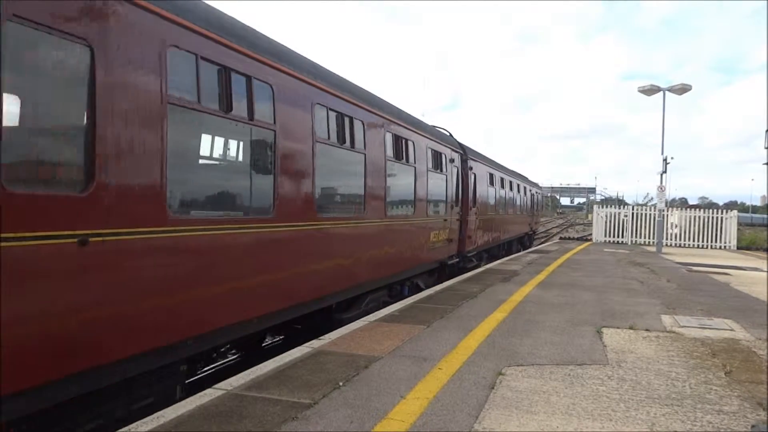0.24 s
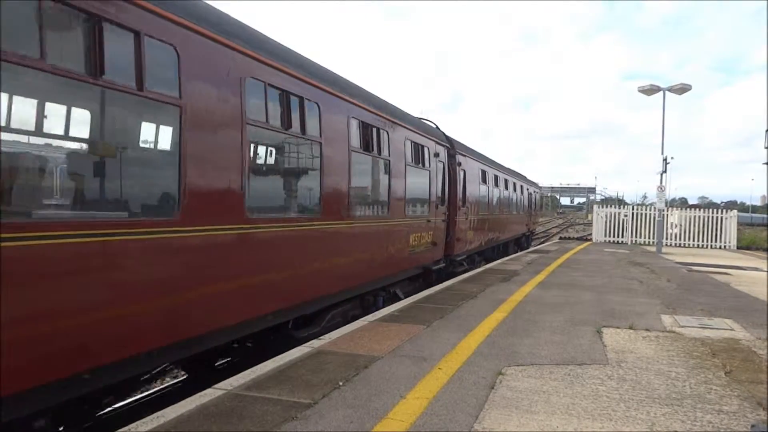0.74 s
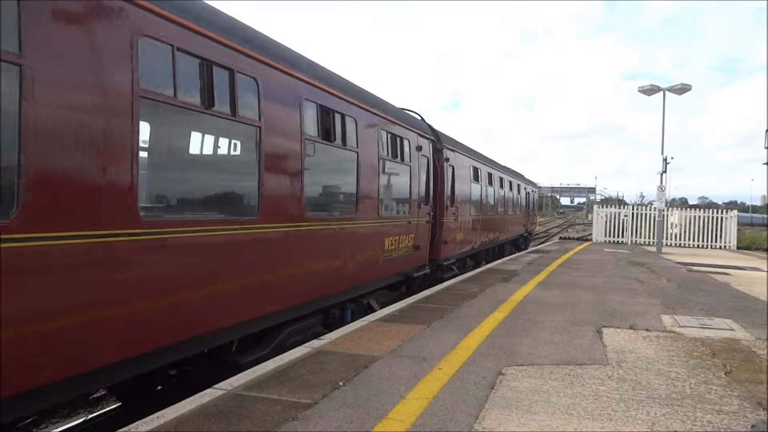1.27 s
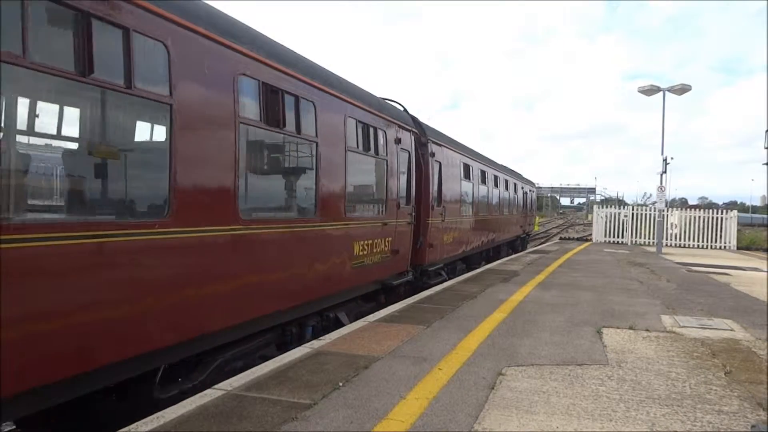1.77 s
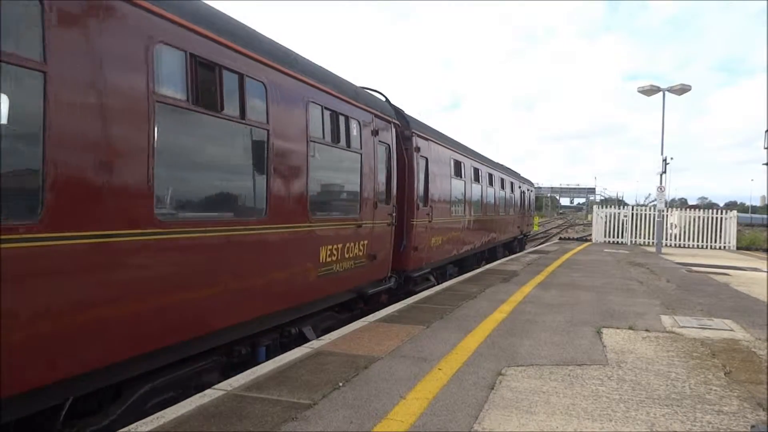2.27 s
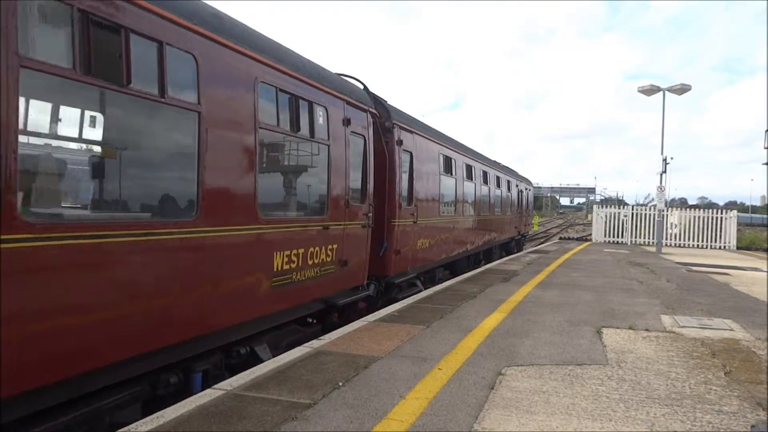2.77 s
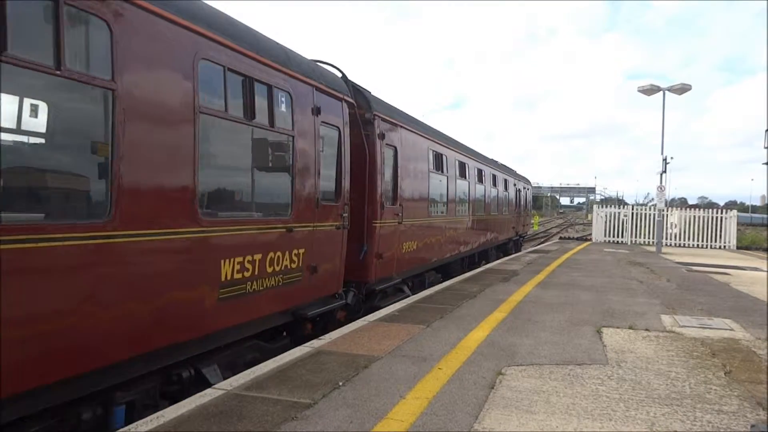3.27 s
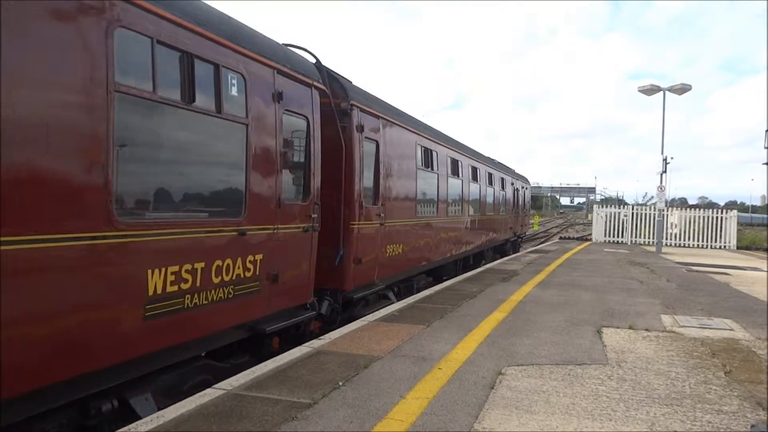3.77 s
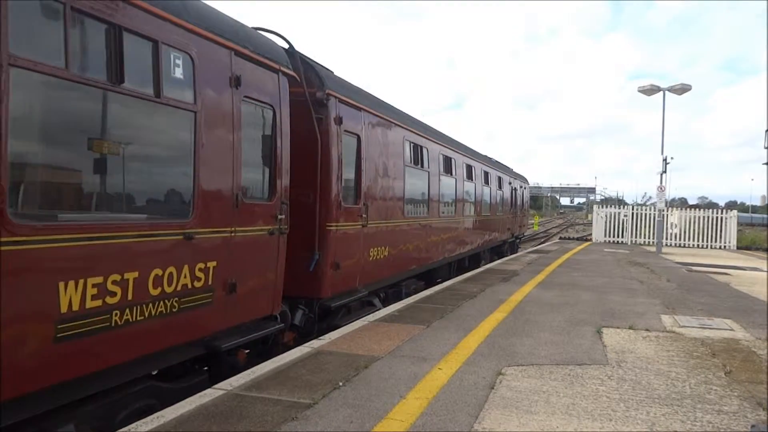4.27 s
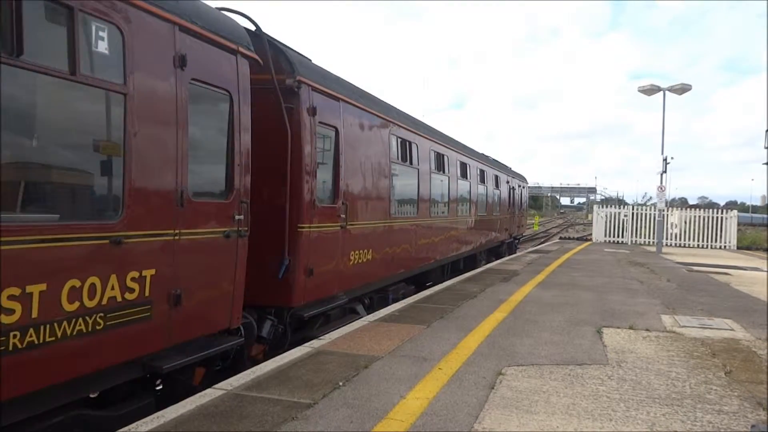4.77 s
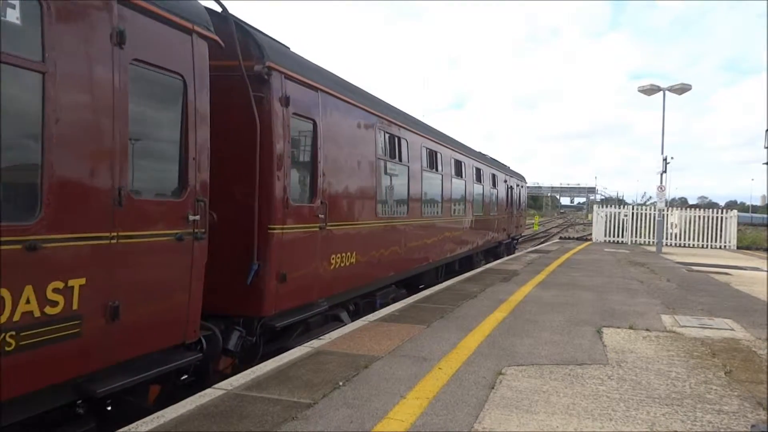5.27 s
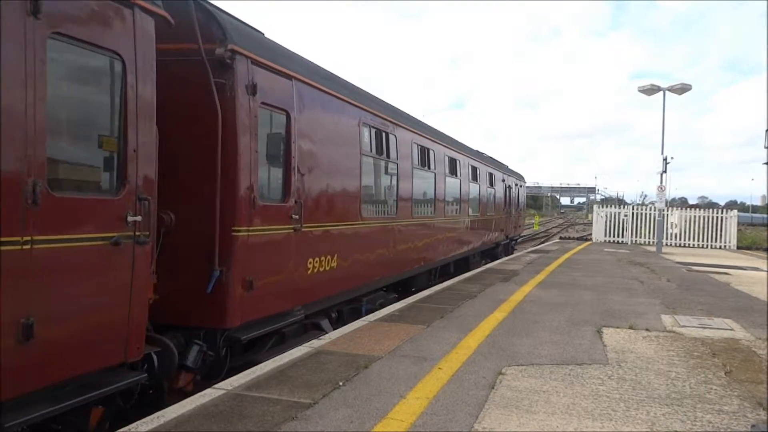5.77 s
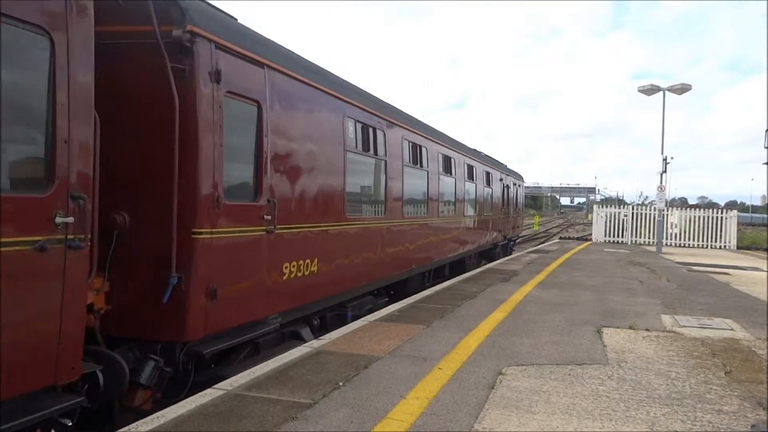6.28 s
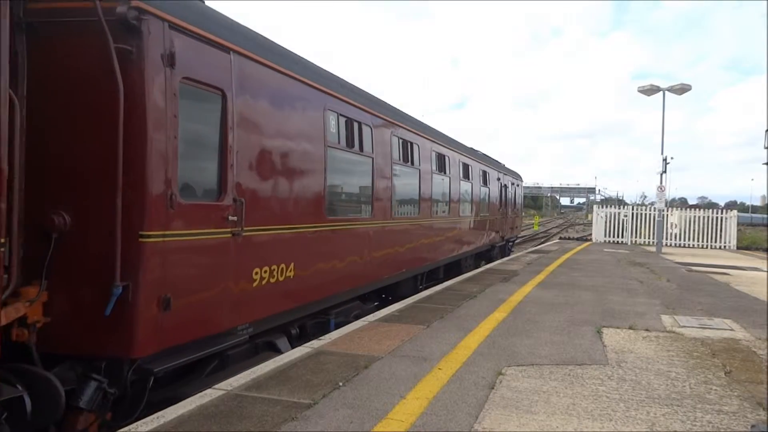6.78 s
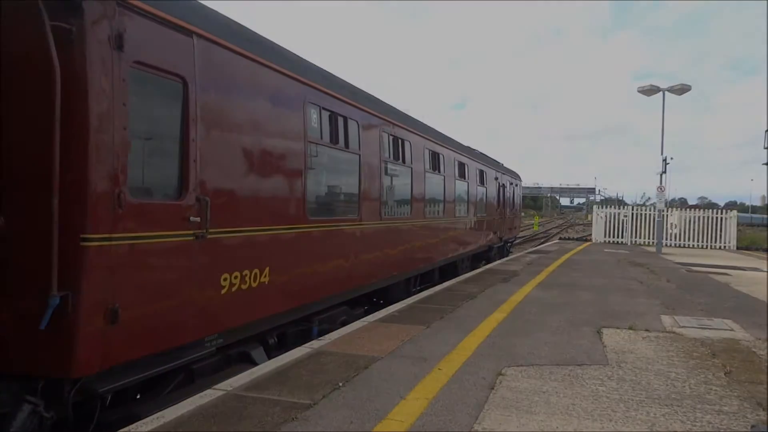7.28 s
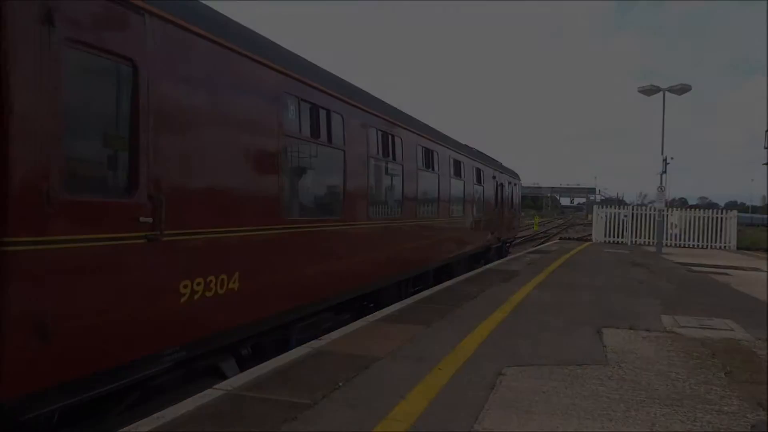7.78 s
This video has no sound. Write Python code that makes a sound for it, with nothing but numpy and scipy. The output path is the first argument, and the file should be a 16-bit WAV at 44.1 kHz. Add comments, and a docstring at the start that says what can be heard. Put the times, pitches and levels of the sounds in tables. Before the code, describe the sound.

Slow train coaches roll by with deep rumble, steely grinding, shrill intermittent flange squeals, a few hard knocks and wind buffeting, all dying away.

```python
"""A diesel engine idles close by while a slow rake of coaches rolls past a station platform; it all recedes.
Engine: exhaust-order sines and a clatter loop. Wheels: bands of patchy noise that rumble, grind, hiss and ring.
Two flanges sing near 5.4-5.5 kHz and other wheel modes cry out briefly, as randomly modulated tones.
Joints and couplings knock: noise bursts through bogie modes. Wind gusts, low noise, buffet the microphone.
"""
import sys
import numpy as np
from scipy import signal
from scipy.fft import rfft, irfft, next_fast_len
from scipy.io import wavfile
from scipy.ndimage import uniform_filter1d, map_coordinates

SR = 44100
rng = np.random.default_rng(int(sys.argv[2]) if len(sys.argv) > 2 else 0)


def decibels_to_gain(level_db):
    """Convert a level in decibels to a linear amplitude gain (20 dB per decade)."""
    exponent = np.asarray(level_db, float) / 20
    return 10 ** exponent


def to_wav(sig):
    """Store sig (one row per channel, or 1-D mono) as 16-bit WAV at the path in sys.argv[1].

    Samples outside -1..1 are clipped; the rate is SR.
    """
    pcm = np.clip(np.atleast_2d(sig), -1, 1) * 32767
    pcm = np.round(pcm).astype(np.int16)
    wavfile.write(sys.argv[1], SR, pcm.T)  # frames by channels


N = 354123
T = np.arange(N) / SR

# Passing train: (time [s], engine level [dB], rolling level [dB], grinding level [dB], top treble level [dB])
PASS = [(0.0, -24, -26.5, -27.5, -55), (0.11, -18.5, -27.5, -25.5, -54.5), (0.71, -25.5, -25.5, -25.5, -53),
        (0.87, -17.5, -27, -26, -55.5), (1.27, -23.5, -25.5, -25.5, -53), (1.45, -18, -24.5, -25.5, -51),
        (1.72, -19, -24.5, -24, -46.5), (1.97, -18, -24, -23, -50.5), (2.88, -17, -24, -25, -50),
        (3.15, -17, -23, -23, -46.5), (3.6, -19, -27, -27, -52.5), (4.67, -18.5, -27, -30, -53.5),
        (5.01, -19.5, -29.5, -31, -53), (5.16, -20, -28, -34, -56), (5.48, -20, -29.5, -32, -53),
        (5.72, -26, -32.5, -38, -63.5), (5.95, -26, -32.5, -42, -67), (6.13, -26, -32.5, -35, -65),
        (6.49, -26, -35, -46, -69.5), (6.73, -27.5, -37, -47, -72.5), (7.56, -31, -41, -52, -76.5),
        (8.03, -36, -46, -57, -84)]
# Wheel noise spectra, relative: (frequency [Hz], density [dB per Hz])
RUMBLE_SPECTRUM = [(11, -37), (18, -27), (48, -0.5), (69, -1), (94, -3.5), (155, -10), (238, -13),
                   (330, -17), (430, -30), (730, -120)]
ROLL_SPECTRUM = [(180, -13), (300, -2), (317, -5.5), (382, 2.5), (429, -3), (484, 3), (532, -0.5),
                 (646, 0.5), (818, -3), (1100, -2), (1500, -8), (1950, -16.5), (3300, -120)]
GRIND_SPECTRUM = [(790, -18), (1350, -2.5), (1750, -3.5), (2090, 2.5), (2290, 0), (2480, 1.5), (3320, -4),
                  (3610, -3), (4560, -11.5), (5100, -12.5), (6630, -16), (11200, -120)]
HISS_SPECTRUM = [(4500, -21), (5000, -0.5), (6200, -3.5), (6600, -18), (7500, -7), (8500, -9), (10000, -15),
                 (12000, -15.5), (14000, -20), (15600, -26)]
# Wheel modes: (frequency [Hz], width [Hz], gain [dB])
WHEEL_MODES = [(3486, 74, 8), (3750, 85, 6.5), (4000, 20, 8.5), (4330, 27, -20), (6654, 94, -4),
               (6931, 150, -0.5), (7400, 190, -1), (7640, 68, -4.5), (7970, 157.5, -6.5), (8257.9, 63, -3),
               (8700, 100, -6.5), (8884, 104, -4.5), (9220, 140, -7.5), (10840, 234, -1.5)]
# Low flange swell: (time [s], level before octave and stereo lean [dB])
LOW_FLANGE = [(0, -52), (.4, -58), (.49, -41), (.6, -52), (.8, -35.5), (.95, -30.5), (1.05, -49),
              (1.55, -50), (1.68, -31.5), (2, -41.5), (2.17, -21), (2.42, -31), (2.5, -25.5), (2.66, -26),
              (2.74, -34.5), (2.89, -40), (3.06, -24), (3.25, -14.5), (3.43, -29.5), (3.68, -21.5),
              (3.81, -32), (4.1, -24), (4.28, -43.5), (4.49, -23), (4.67, -34), (4.98, -24), (5.17, -33.5),
              (5.3, -51), (5.5, -25.5), (5.6, -28), (5.8, -42.5), (6.07, -27.5), (6.21, -34), (6.36, -38),
              (6.55, -61), (6.65, -94)]
# High flange catches: (time [s], hold [s], level before octave and stereo lean [dB])
CATCHES = [(0.335, .1, -35.5), (0.436, 0.036, -33), (0.637, 0.004, -19.5), (.71, .11, -33),
           (1.076, .1, -39), (1.238, 0.305, -39.5), (1.57, 0.096, -20.5), (1.761, 0.34, -25),
           (2.313, .04, -19), (2.447, 0.095, -31), (2.77, 0.0425, -38), (2.901, .1, -29.5),
           (3.019, 0.0604, -24.5), (3.313, 0.088, -27), (3.5, 0.25, -30), (3.819, 0.17, -27.5),
           (4.1, 0.1074, -39), (4.305, .08, -26), (4.414, .1, -34), (4.721, 0.066, -24), (4.82, 0.12, -28),
           (5.04, 0.2, -37), (5.302, .05, -21.5), (5.417, 0.156, -24), (5.68, 0.084, -31),
           (5.83, 0.039, -38), (6.0, 0.37, -50), (6.319, 0.18, -45.5), (6.57, 0.19, -46),
           (6.855, 0.32, -57), (7.24, .1, -65), (7.496, .1, -63), (7.63, 0.033, -56), (7.76, 0.13, -71)]
# Pitch at the start of each catch: (frequency [Hz])
CATCH_HZ = np.array([5530, 5525, 5485, 5510, 5550, 5545, 5445, 5525, 5465, 5495, 5500, 5545, 5515, 5465, 5515, 5525, 5525, 5480, 5490, 5460, 5495, 5510, 5460, 5475, 5500, 5520, 5510, 5520, 5530, 5520, 5520, 5515, 5510, 5515])
# Squeals of other wheel modes: (time [s], nominal length [s], pitch [Hz], level before trim [dB])
CRIES = [(0.633, 0.12, 7680.0, -51), (1.58, 0.25, 7640.0, -47), (2.1, 0.06, 7160, -51),
         (2.299, 0.15, 7640.0, -36.5), (2.315, 0.092, 8880.0, -37), (2.301, 0.089, 2133, -27),
         (2.9, 0.42, 3520.0, -34), (3.12, 0.0757, 7100, -37), (3.167, 0.075, 7970.0, -41),
         (3.3, 0.116, 7430, -31.5), (3.3, 0.15, 9100, -40), (3.303, 0.13, 3760, -32),
         (3.3, 0.176, 1830, -33.5), (3.4, 0.15, 4000.0, -35), (3.897, 0.07, 7275, -41.5),
         (3.905, 0.15, 8950, -49.5), (4.318, 0.065, 7420.0, -38.5), (4.319, 0.12, 9220.0, -34),
         (4.365, 0.1179, 3745, -39.5), (4.688, 0.135, 9200.0, -34.5), (4.752, 0.5, 3750, -37.5),
         (4.768, 0.064, 1653, -30), (4.839, 0.32, 2680.0, -35.5), (4.88, 0.17, 8040.0, -41),
         (4.88, 0.17, 9200, -41), (5.068, 0.15, 9200, -41), (4.928, 0.11, 1782, -31),
         (5.27, 0.47, 9220.0, -40.5), (5.3, 0.34, 1780, -35.5), (5.3, 0.38, 3720, -44),
         (5.473, 0.35, 4000.0, -38.5), (5.5, 0.23, 8700.0, -57), (5.55, 0.54, 2210.0, -47.5),
         (5.948, 0.26, 8780.0, -54), (6, 0.0453, 4000, -54), (6.105, 0.16, 2680, -46),
         (6.1, 0.15, 8101, -56)]
# Knocks: (time [s], level before trim [dB], time to fall 20 dB [s], blow centre [Hz], blow spread [Hz])
KNOCKS = [(0.527, -13.5, 0.13, 596, 316), (2.513, -23, .04, 604, 400), (3.072, -17, 0.066, 830, 250),
          (4.091, -5.5, 0.032, 550, 700), (4.691, -18, .04, 216, 120), (4.904, -24.5, 0.024, 500, 250),
          (6.095, -25, 0.077, 1300, 700), (6.277, -16, 0.077, 990, 1020), (6.508, -31.5, .02, 900, 900),
          (6.698, -18.5, 0.026, 600, 503), (7.541, -28, 0.037, 496, 700)]
# Bogie modes: (frequency [Hz], width [Hz], gain [dB])
BOGIE_MODES = [(228, 30, 17.5), (352.53, 35, 12), (466, 29, -5), (614, 74, 3), (776, 99, -1),
               (950, 42, 0.5), (1111, 50, -0.5), (1300, 210, -9.5), (2210, 300, -2.5), (3400, 610, -14)]
# Exhaust orders from the third up: (level re engine [dB])
ORDER_DB = [-36.5, -10, -7.5, -10, -34, -1, -30, -20, -9, -17.5, -37, -28, -30.5]
# Lines of a second, slightly slower drone: (frequency [Hz])
SLOW_HZ = [32.5, 34.5, 40.7, 81.3]
# The same lines: (level re engine [dB])
SLOW_DB = [-24.5, -24, -9, -15.5]
# Engine block modes: (frequency [Hz], width [Hz], gain [dB])
BLOCK_MODES = [(196, 23, 0), (259, 86, 2.5), (383, 9.2, -4), (475.7, 42, 1), (571.4, 25.5, 4.5),
               (659.9, 53, 5), (1094, 38.4, 0), (1217, 44, 1.5), (2110, 560, -15.5)]
# Gusts: (time of peak [s], full width at 1/e [s], relative level [dB], sharpness [0-1])
GUSTS = [(0.112, 0.067, -17.5, .3), (0.303, 0.15, -22, 0.3), (.45, 0.13, -27, 0.2), (0.62, 0.12, -29, 0.2),
         (0.766, 0.15, -21, 0.3), (0.93, 0.122, -18.5, 0.46), (1.147, 0.091, -34, 0.2),
         (1.308, 0.13, -25.5, 0.18), (1.57, 0.24, -25, 0.2), (2.547, 0.082, -21, 0.12),
         (3.1, 0.097, -25, 0.37), (3.195, 0.19, -19, 0.34), (3.3, 0.078, -17.5, 0.8),
         (3.38, 0.092, -17, 0.3), (3.5, 0.076, -13, 0.08), (3.63, 0.13, -16, 0.5),
         (3.772, 0.096, -21.5, 0.3), (3.891, 0.11, -32, 0.2), (4.02, .12, -16, 0.55),
         (4.124, 0.064, -21, .5), (7.282, 0.083, -37, 0.6)]
# Wind spectra, relative: (frequency [Hz], density [dB per Hz])
DULL_WIND = [(12, -41), (25, 9), (50, 6), (95, 16), (160, -8), (230, -31), (400, -70)]
SHARP_WIND = [(40, -29.5), (100, 9), (210, 4), (330, -12), (500, -37), (900, -66.5)]
# Stereo noise likeness: (frequency [Hz], left-right likeness [0-1])
ALIKE = [(60, .94), (150, .87), (380, .92), (950, .9), (2380, .9), (5980, .91), (9000, .91), (13000, .95)]
# Stereo lean: (frequency [Hz], left over right [dB])
LEAN = [(30, .8), (70, 1), (250, 2.6), (600, 1.8), (2000, 2), (5000, 2.6), (9000, 2.2), (13000, .3)]


def wheels(roll_db, grind_db, top_db, bite_db):
    """Rough steel on rough steel: roll, grind and hiss shake together; rubbing flanges hiss and ring the modes."""
    shake = wobble(9)
    rumble_db = -25.5 + 1.1 * (roll_db - roll_db.mean())  # swings wider than the rolling
    hiss_db = together(top_db + 13, bite_db - 25)
    ring_db = together(grind_db - 16.5, bite_db - 13.5)
    low = decibels_to_gain(rumble_db + 1.92 * wobble(5.98)) * rush(RUMBLE_SPECTRUM, patchy_db=-1.5)
    roll = decibels_to_gain(roll_db + 0.14 * shake) * rush(ROLL_SPECTRUM, patchy_db=1.5)
    grind = decibels_to_gain(grind_db + 0.9 * shake + 0.42 * wobble(25)) * rush(GRIND_SPECTRUM, patchy_db=1.0)
    hiss = decibels_to_gain(hiss_db + 0.641 * shake + 0.69 * wobble(350)) * rush(HISS_SPECTRUM, patchy_db=0.5)
    ring_gain = decibels_to_gain(ring_db + 1.5 * wobble(30))
    white = rush([(1000, 0)], patchy_db=2.5)
    ring = ring_gain * unit(filtered(white, modes(WHEEL_MODES)))
    return low + roll + grind + hiss + ring


def flanges(low_db, high_db, high_hz):
    """Two wheels sing by stick-slip on neighbouring modes; the harder they sing, the stronger the octave."""
    low_hz, low_width_hz, high_width_hz, steady = 5370, 70, 95, 0.9
    octave_grows = 0.32  # dB gained on the tone per dB of squeal
    low_octave_db = -14.5 + octave_grows * low_db
    high_octave_db = -13 + octave_grows * high_db
    low = decibels_to_gain(low_db) * song(np.full(N, low_hz), low_width_hz, steady, low_octave_db)
    high = decibels_to_gain(high_db) * song(high_hz, high_width_hz, steady, high_octave_db)
    left_right_db = [[0.65], [-0.65]]  # from the left
    return (low + high) * decibels_to_gain(left_right_db)


def catches():
    """Level and pitch of the high flange: it catches, holds and lets go, its pitch gliding to a rest value."""
    rise_s, let_go_db_per_s = 0.019, 139
    rest_hz, glide_s = 5540, 0.4  # glide: time constant
    t = T[::64]
    start, hold, db = np.transpose(CATCHES)[:, :, None]
    rise_db = 20 * np.log10(np.clip((t - start) / rise_s, 1e-4, 1))
    fall_db = let_go_db_per_s * np.clip(t - start - rise_s - hold, 0, None)
    level_db = together(*(db + rise_db - fall_db))
    last = np.clip(np.searchsorted(start[:, 0], t) - 1, 0, None)
    since_s = np.clip(t - start[last, 0], 0, None)
    pitch_hz = rest_hz + (np.asarray(CATCH_HZ)[last] - rest_hz) * np.exp(-since_s / glide_s)
    return np.interp(T, t, level_db), np.interp(T, t, pitch_hz)


def song(pitch_hz, width_hz, steady, octave_db):
    """Stick-slip on a wheel mode: a steady plus a random swing, rms 1 before its octave is added."""
    size = len(pitch_hz)
    swing = steady + wobble(width_hz, size=size) + 1j * wobble(width_hz, size=size)
    swing += 0.18 * (wobble(3 * width_hz, size=size) + 1j * wobble(3 * width_hz, size=size))  # faint skirts
    swing /= np.sqrt(np.mean(abs(swing) ** 2))
    tone = swing * np.exp(2j * np.pi * np.cumsum(pitch_hz) / SR)
    octave = tone ** 2 / np.sqrt(abs(tone) + 1e-9)
    return np.sqrt(2) * (tone + decibels_to_gain(octave_db) * octave).real


def cries():
    """Wheel modes catch quickly and let go slowly, swelling and breaking up; higher modes are rougher."""
    trim_db, flutter_db = 2.0, 3
    out = np.zeros(N + SR)
    for s, length, hz, db in CRIES:
        u = np.linspace(0, 1, round(1.127 * length * SR))
        shape = np.sqrt(np.clip(u / 0.17, 0, 1) * np.clip((1 - u) / 1.14, 0, 1))
        voice = song(hz + 0 * u, width_hz=40 + 0.0102 * hz, steady=0.11, octave_db=-30)
        gain = decibels_to_gain(db + trim_db + flutter_db * wobble(13.8, size=len(u)))
        out[round(s * SR):][:len(u)] += gain * shape * voice
    return out[:N]


def knocks():
    """A sharp blow and a noise rattle ring the bogie modes near the blow's centre, with a bright edge."""
    trim_db, crack_db, crack_t60_s = -6.5, -14, 0.026
    out, t = np.zeros(N + SR), np.arange(SR // 4) / SR
    for s, db, length, hz, spread in KNOCKS:
        blow = rng.standard_normal(len(t)) * decibels_to_gain(-20 * (t / length) ** 1.48)
        blow[0] = 0.81 / length  # short blows start harder
        ring = filtered(blow, lambda f: modes(BOGIE_MODES)(f) * modes([(hz, spread, 0)])(f) ** 2)
        ring /= np.sqrt(np.mean(ring[:round(length * SR / 2)] ** 2))
        bright = filtered(rng.standard_normal(len(t)), modes([(hz, 5000, 0)]))
        crack = decibels_to_gain(crack_db - 60 * t / crack_t60_s) * bright
        out[round(s * SR):][:len(t)] += decibels_to_gain(db + trim_db) * (ring + crack)
    return out[:N]


def engine(level_db):
    """Clean low exhaust orders, and a knocking clatter that repeats itself every engine cycle."""
    cycle_hz = 8.342
    hz = np.append(cycle_hz * np.arange(3, 3 + len(ORDER_DB)), SLOW_HZ)
    lead_turns = np.array([[0.018], [-0.018]])  # the drone reaches the left port first
    exhaust = 0
    for f, db in zip(hz, [*ORDER_DB, *SLOW_DB]):
        gain = decibels_to_gain(db + 1.1 * wobble(1.29)) * np.sqrt(2)
        exhaust = exhaust + gain * np.sin(2 * np.pi * (f * T + rng.random() + lead_turns))
    turn = np.arange(4096) / 4096
    firing = decibels_to_gain(-7 * (8 * turn % 1) - 1.689 * (2 * turn % 1))  # eight firings, two of them harder
    lines = rfft(rng.standard_normal((2, 4096)) * firing)
    lines = lines * modes(BLOCK_MODES)(np.arange(2049) * cycle_hz)
    shared, apart = [np.interp(T * cycle_hz % 1, turn, unit(c), period=1) for c in irfft(lines)]
    clatter = shared + 0.303 * np.array([apart, -apart])
    return decibels_to_gain(level_db) * (exhaust + decibels_to_gain(-10) * clatter)


def canopy(x):
    """The coach sides and platform scatter a short, wide echo: stereo noise decaying 60 dB in 0.1 s."""
    t = np.arange(SR // 5) / SR
    tail = rng.standard_normal((2, len(t))) * decibels_to_gain(-60 * t / 0.1)
    return signal.fftconvolve(x[None], tail / np.linalg.norm(tail[0]), axes=1)[:, :N]


def wind():
    """Gusts buffet each microphone port on its own, in lumps; sharp gusts reach higher."""
    t = T[::64]
    peak, width, db, sharp = np.transpose(GUSTS)[:, :, None]
    swell = decibels_to_gain(db) * np.exp(-(2 * (t - peak) / width) ** 2)
    out = 0
    for share, spectrum in ((1 - sharp, DULL_WIND), (sharp, SHARP_WIND)):
        power = np.sum(share.clip(0, 1) * swell ** 2, axis=0)
        level = np.interp(T, t, np.sqrt(power))
        air = unit(filtered(rng.standard_normal((2, N)), lambda hz: decibels_to_gain(along(spectrum, hz))))
        lumps = decibels_to_gain(2.9 * np.array([wobble(22.14), wobble(21.94)]))
        out = out + level * unit(air * lumps)
    return out - 0.28 * out[::-1]  # a push on one port is partly a pull on the other


def rush(spectrum, patchy_db):
    """Stereo noise of rms 1 with patches of random gain in time and frequency."""
    z = signal.stft(rng.standard_normal((2, N)), nperseg=512)[2]
    field = uniform_filter1d(rng.standard_normal(z.shape[1:]), size=5, axis=0)
    field = uniform_filter1d(field, size=12, axis=1)
    pair = signal.istft(z * decibels_to_gain(patchy_db * unit(field)), nperseg=512)[1][:, :N]

    def mid_side(hz):
        angle = np.arccos(np.clip(along(ALIKE, hz), -1, 1)) / 2
        return decibels_to_gain(along(spectrum, hz)) * np.array([np.cos(angle), np.sin(angle)])

    mid, side = filtered(pair, mid_side)
    return unit(np.array([mid + side, mid - side]))


def modes(table):
    """Causal response of (Hz, width Hz, dB) resonances, alternating in sign."""
    def response(f):
        return sum((-1) ** k * decibels_to_gain(db) * 1j * f * w / (c * c - f * f + 1j * f * w)
                   for k, (c, w, db) in enumerate(table))
    return response


def filtered(x, response):
    """x times a complex response of frequency."""
    m = next_fast_len(x.shape[-1] + 8192)
    return irfft(rfft(x, m) * response(np.fft.rfftfreq(m, 1 / SR)), m)[..., :x.shape[-1]]


def wobble(rate, size=N):
    """A smooth random curve, rate knots a second, at most 400."""
    knots = rng.standard_normal(int(size * 400 / SR) + 4)
    return map_coordinates(knots, [np.arange(size) * min(rate, 400) / SR])


def together(*levels_db):
    """Level of unrelated sounds heard together: powers add."""
    return 10 * np.log10(sum(decibels_to_gain(db) ** 2 for db in levels_db))


def unit(x):
    """Scale to rms 1."""
    return x / np.sqrt(np.mean(x ** 2) + 1e-20)


def along(points, hz):
    """Interpolate (Hz, value) points on a log axis."""
    f, v = np.transpose(points)
    return np.interp(np.log(hz + 1), np.log(f + 1), v)


def curves(rows):
    """One value per sample for each column after the time."""
    s, *cols = np.transpose(rows)
    return [np.interp(T, s, c) for c in cols]


def scene():
    """Engine, wheels and metal sounds along the platform edge, with wind at the microphone."""
    engine_db, *rolling_db = curves(PASS)
    low_db, = curves(LOW_FLANGE)
    high_db, high_hz = catches()
    metal = cries() + knocks()
    squeal = flanges(low_db, high_db, high_hz)
    bite_db = together(low_db - 3, high_db)  # the low flange rubs more gently
    train = engine(engine_db) + wheels(*rolling_db, bite_db) + metal + squeal
    echo = decibels_to_gain(-10) * canopy(metal + squeal.mean(axis=0))
    return train + echo + wind()


def band_limit(x):
    """A steep low-pass at the top of the band."""
    return signal.sosfilt(signal.butter(12, 15650, fs=SR, output="sos"), x)


def record(dry):
    """The train runs left of the microphone pair; the loudest peaks are rounded off."""
    halves = np.array([[1], [-1]]) / 2
    leaning = filtered(dry, lambda hz: decibels_to_gain(along(LEAN, hz) * halves))
    rounded = leaning / (1 + np.abs(leaning / 0.95) ** 6) ** (1 / 6)
    return band_limit(rounded)


dry = scene()
out = record(dry)
to_wav(out)
```